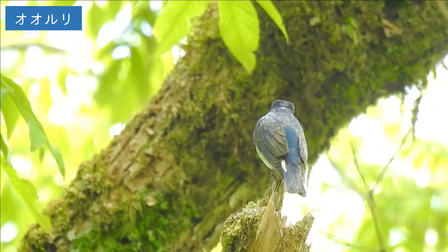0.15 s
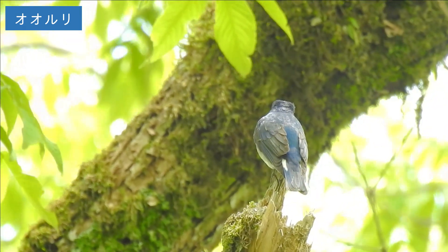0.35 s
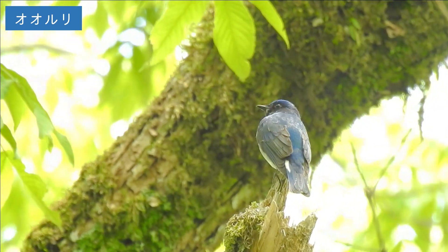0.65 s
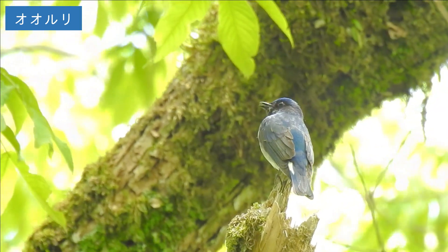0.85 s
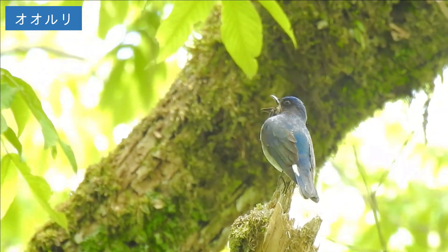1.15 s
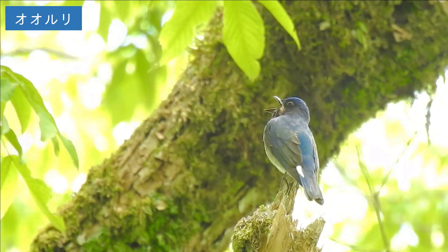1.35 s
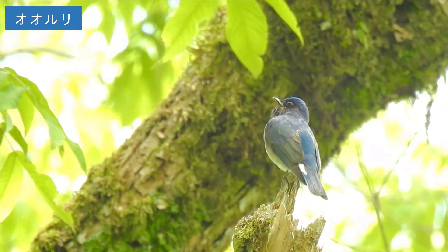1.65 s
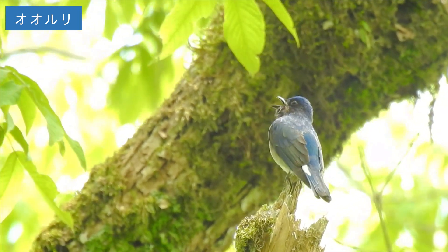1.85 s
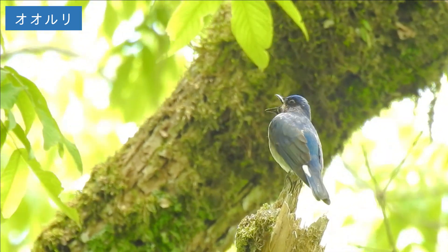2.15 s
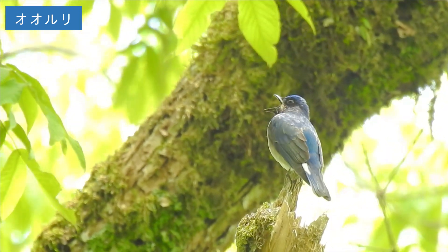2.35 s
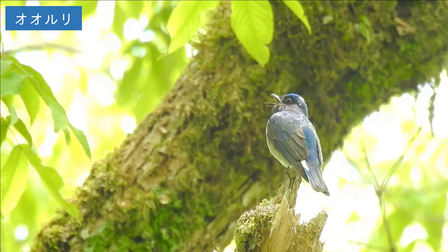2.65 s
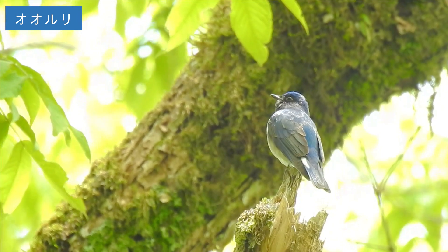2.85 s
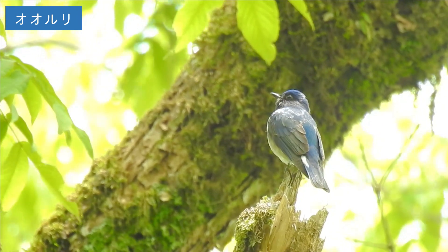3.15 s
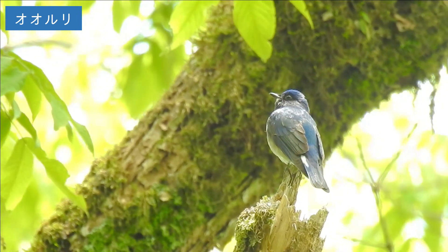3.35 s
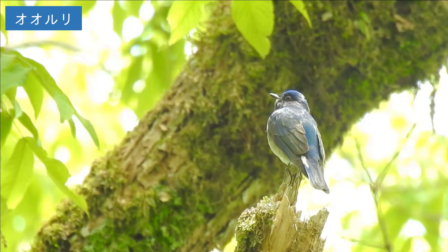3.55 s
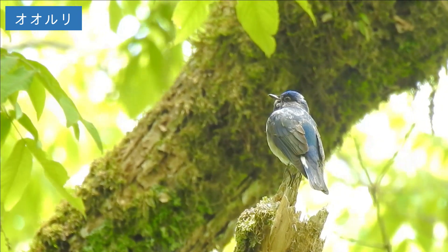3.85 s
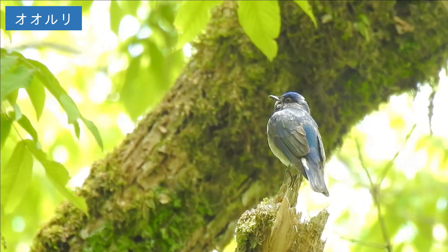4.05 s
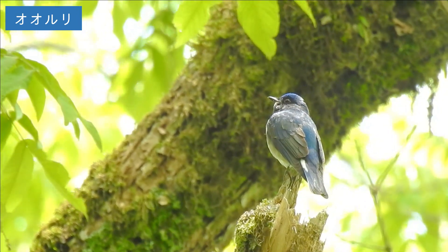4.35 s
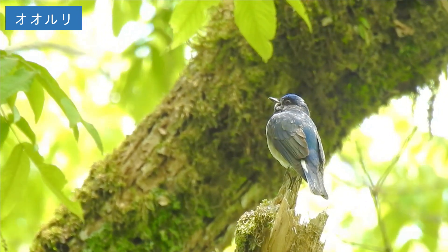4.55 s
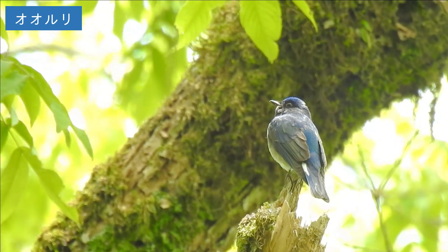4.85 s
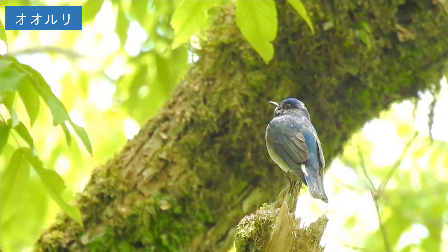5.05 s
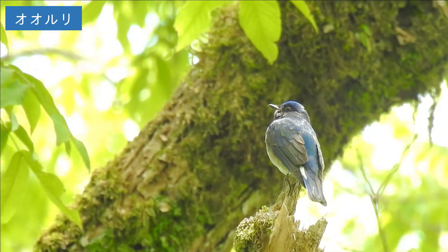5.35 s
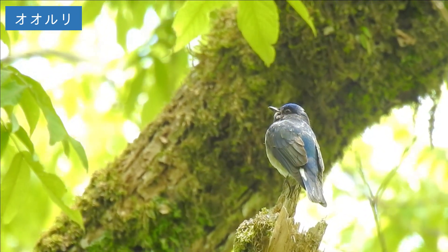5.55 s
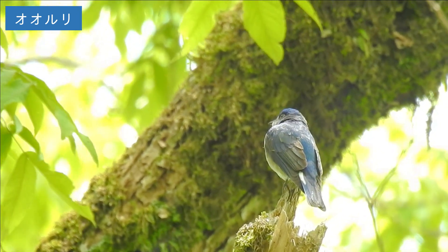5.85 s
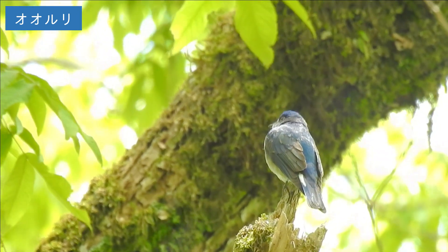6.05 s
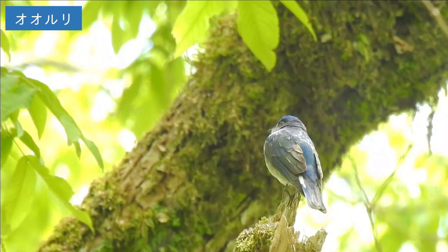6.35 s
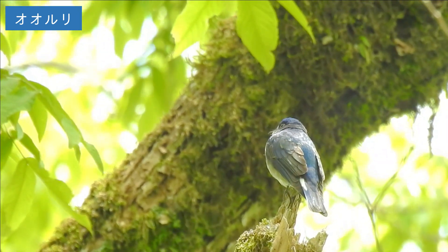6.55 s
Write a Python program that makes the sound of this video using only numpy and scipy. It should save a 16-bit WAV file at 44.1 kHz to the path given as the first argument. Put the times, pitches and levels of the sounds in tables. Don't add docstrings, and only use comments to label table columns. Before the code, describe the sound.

In an echoing wood, far thrushes whistle softly over low rumble, distant stream and leaf hiss. About a second in, a near songbird delivers high and low whistles, then a fast sinking trill, hoarse sweeps and a dry rattling buzz. A fly briefly thrums close to the left microphone during the trill. Afterwards only faint birds and tiny twig ticks remain, with one soft arching whistle near the end.

```python
import sys
import numpy as np
from scipy import signal
from scipy.fft import rfft, irfft, next_fast_len
from scipy.io import wavfile
from scipy.ndimage import uniform_filter1d, map_coordinates

SR = 44100
rng = np.random.default_rng(int(sys.argv[2]) if len(sys.argv) > 2 else 0)


def output_pcm(signal):
    pcm = np.clip(np.atleast_2d(signal).T, -1, 1) * 32767
    wavfile.write(sys.argv[1], SR, np.round(pcm).astype(np.int16))


def ratio_of_db(decibels):
    return 10 ** (np.asarray(decibels, float) / 20)


N = 295911

# f/Hz, t60/s
TREE_DECAY = [(1500, 0.98), (4000, 1), (8000, 0.64), (14000, 0.22)]


def singer():
    # f/Hz, depth/dB
    second_voice = [(3930, -38.5), (7860, -62)]
    # f/Hz, level/dB
    port_colour = [(5600, 0), (6900, 5.5), (8000, 0), (8800, -3), (12000, -4.5), (14000, -17),
                   (16000, -18.5)]
    # t/s, echo level/dB, hoarseness/dB
    facing = [(.95, -8, .4), (1.365, -8, .4), (1.375, -3, 1.1), (1.8, -2, 1.1), (1.815, -10, .4),
              (1.96, -10, .4), (1.972, -3, 2.2), (2.2, -6, 2.2)]
    paths = np.zeros((2, N))
    t = np.arange(N) / SR
    waver = 17 * tremor(250)
    for k, (s, length, from_hz, to_hz, db, swell) in enumerate(phrase()):
        note = whistle(length, from_hz, to_hz, swell, edge=0.65, waver=waver[round(s * SR):])
        add(paths[k % 2], s, ratio_of_db(db) * note)
    flutter = sum(2 * ratio_of_db(db) * np.cos(2 * np.pi * hz * t) for hz, db in second_voice)
    paths = paths * (1 + flutter * (t < 1.372))
    paths = filtered(paths, lambda hz: ratio_of_db(along(port_colour, hz)))

    s, echo_db, hoarse_db = np.transpose(facing)
    paths = paths * ratio_of_db(np.interp(t, s, hoarse_db) * tremor(330)[:N])
    thrown = paths * ratio_of_db(np.interp(t, s, echo_db))
    haze = echoes(thrown, alike=0.4, near_db=9, near_t60=0.3)
    notes = panned(paths.sum(axis=0) + haze, 1.8)

    rattle = buzz()
    rattle_haze = ratio_of_db(2) * echoes(rattle[None], alike=0.2, near_db=3, near_t60=0.3)
    return notes + panned(rattle + rattle_haze, 3.2)


def phrase():
    # t/s, length/s, end f/Hz, level/dB
    high = [(0.958, 0.057, 5380, -26.5), (1.001, 0.02, 5460, -25.5), (1.026, 0.025, 5515, -28.5),
            (1.155, 0.052, 5330, -22), (1.198, 0.013, 5405, -20), (1.216, 0.1, 5304, -30)]
    # t/s, level/dB
    flips = [
        (1.018, -36),
        (1.212, -31),
    ]
    # t/s, length/s, level/dB
    held = [(1.026, 0.056, -22.5), (1.069, 0.025, -19.5), (1.09, 0.016, -23), (1.118, 0.031, -22.5),
            (1.14, 0.044, -28), (1.218, 0.047, -20.5), (1.265, 0.029, -17), (1.31, 0.046, -23.5),
            (1.352, .026, -27.5)]
    # t/s, level/dB, drop/Hz
    trill = [(1.371, -25, 200), (1.411, -20.5, 227), (1.448, -21, 290), (1.48, -18, 499),
             (1.524, -18.5, 243), (1.556, -15.5, 251), (1.588, -18, 71.2), (1.629, -20, 223),
             (1.666, -22, 155.5), (1.704, -24, 89.3), (1.743, -40.5, 59), (1.774, -31, 29.4)]
    # t/s, length/s, start f/Hz, end f/Hz, level/dB
    closing = [(1.815, .026, 3720, 3530, -26.5), (1.834, 0.031, 3540, 3472, -17.5),
               (1.86, 0.019, 3440, 3444, -22.5), (1.872, 0.046, 3413, 3395, -17),
               (1.921, 0.025, 3384, 3365, -16), (1.945, 0.01, 3330, 3214, -25.5),
               (1.974, .03, 4380, 3906, -27), (1.968, .02, 4000, 3960, -32), (2.0, .03, 4200, 3850, -29),
               (2.04, .03, 4300, 3900, -34), (1.978, .062, 3950, 3322, -22),
               (2.062, 0.0524, 3750, 3347, -25.5)]
    climb_hz, high_swell = 80, 0.72
    flip_s, flip_hz = 0.012, 4990
    held_hz, held_swell = 4300, 0.33
    stroke_s, stroke_swell = 0.0337, 0.24
    trill_top_hz, trill_rest_hz, trill_sink_s = 4415, 3836, 0.118
    lead_s, lead_hz, lead_db = 0.011, 330, -20

    notes = [(s, length, hz - climb_hz, hz, db, high_swell) for s, length, hz, db in high]
    notes += [(s, flip_s, flip_hz, held_hz, db, held_swell) for s, db in flips]
    notes += [(s, length, held_hz, held_hz, db, held_swell) for s, length, db in held]
    strokes, leads = [], []
    for s, db, drop_hz in trill:
        sunk = np.exp((trill[0][0] - s) / trill_sink_s)
        land_hz = trill_rest_hz + (trill_top_hz - trill_rest_hz) * sunk
        top_hz = land_hz + drop_hz
        strokes.append((s, stroke_s, top_hz, land_hz, db, stroke_swell))
        leads.append((s - lead_s / 4, lead_s, top_hz + lead_hz, top_hz, db + lead_db, stroke_swell))
    return notes + strokes + leads + [(*note, 0.64) for note in closing]


def whistle(length, from_hz, to_hz, swell, edge, waver):
    # multiple of the pitch, level/dB
    overtones = [(2, -37), (3, -39)]
    u = np.linspace(0, 1, max(round(length * SR), 8))
    pitch_hz = to_hz + (from_hz - to_hz) * (1 - u) ** 2.394 + waver[:len(u)]
    turns = 2 * np.pi * np.cumsum(pitch_hz) / SR
    swell_place = np.interp(u, [0, np.clip(swell, 0.05, 0.95), 1], [0, 0.5, 1])
    shape = np.sin(np.pi * swell_place) ** edge
    tone = np.sin(turns) + sum(ratio_of_db(db) * np.sin(k * turns) for k, db in overtones)
    return np.sqrt(2) * shape * tone


def buzz(rate_hz=216, life=0.0023):
    # t/s, level/dB
    effort = [(2.238, -27), (2.284, -28), (2.3, -76), (2.333, -64), (2.336, -25), (2.42, -23), (2.5, -32),
              (2.621, -34), (2.77, -46)]
    # f/Hz, density/dB per Hz
    beak = [(2530, -43.5), (4300, -7), (5300, -2), (6640, -5), (7350, -3), (8570, -3.5), (9870, -19),
            (11100, -16), (12600, -30), (13200, -45), (15000, -49)]
    # start t/s, end t/s
    breaths = [
        (2.239, 2.3),
        (2.3352, 2.77),
    ]
    fresh_hz, spent_hz = (4910, 9257), (6500, 8100)
    narrow_s, return_db = 2.46, -6
    s, effort_db = np.transpose(effort)
    luck = rng.standard_normal((130, 3))
    beats = np.concatenate([np.arange(a, b, 1 / rate_hz) for a, b in breaths])
    beat_db = np.interp(beats, s, effort_db)
    spent = np.interp(beats, [narrow_s, s[-1]], [0, 1])[:, None] ** 0.76
    low_hz, top_hz = (full + (last - full) * spent for full, last in zip(fresh_hz, spent_hz))

    u = np.linspace(0, 1, round(life * SR))
    turns = 2 * np.pi * np.cumsum(top_hz + (low_hz - top_hz) * u, axis=1) / SR
    chirps = np.sin(np.pi * u) ** 1.04 * np.sin(turns)
    chirps = chirps + 3 * chirps ** 2
    out = np.zeros(N)
    for at, chirp, db, (late, size, back) in zip(beats, chirps, beat_db, luck):
        upward = ratio_of_db(return_db + 3 * back) * chirp[::-1]
        beat = np.concatenate([chirp, upward])
        add(out, at + 0.00045 * late, ratio_of_db(db + 2 * size) * beat)
    return 2.54 * filtered(out, lambda hz: ratio_of_db(along(beak, hz)))


def arch():
    start_s, up_s, down_s = 6.045, 0.155, 0.056
    foot_hz, top_hz = 3150, 4200
    path = np.zeros(N)
    waver = 35 * tremor(199.3)
    up = whistle(up_s, foot_hz, top_hz, 0.98, edge=0.37, waver=waver)
    down = whistle(down_s, foot_hz, top_hz, 0.6, edge=0.25, waver=waver)[::-1]
    add(path, start_s, ratio_of_db(-47) * np.concatenate([up, ratio_of_db(0.5) * down]))
    haze = echoes(path[None], alike=0.31, near_db=8.0, near_t60=0.39)
    return panned(path + ratio_of_db(3.5) * haze, 1.6)


def flies():
    # t/s, wing f/Hz, left level/dB, right level/dB, tilt/dB per octave of overtones,
    # odd partials/dB as it turns edge-on
    passes = [
        [(1.49, 122.7, -67.5, -74, -7, 0), (1.52, 128, -15.5, -39, -17, 1), (1.545, 170.2, -7.5, -26, -8.5, 1),
         (1.56, 176.7, -14, -24.5, -3.5, -2.5), (1.578, 177.2, -11, -28, -8, -15),
         (1.595, 175.5, -34, -43, -6, -16), (1.612, 168, -40, -58, -2, -5), (1.632, 162, -30, -49, -4.5, -11.5),
         (1.68, 159.5, -53, -60, -7, 2)],
        [(6.59, 167.7, -51, -45, -11, -1), (6.65, 170.8, -58, -45.5, -1.5, -1),
         (6.69, 181, -48, -38.5, -3.5, 0), (6.71, 177, -46, -49.5, -9, 0)],
    ]
    wing_side = [-1, 1]
    out = np.zeros((2, N))
    gust = tremor(85.0)
    for path, side in zip(passes, wing_side):
        s, *cols = np.transpose(path)
        t = np.arange(s[0], s[-1], 1 / SR)
        hz, left_db, right_db, tilt_db, odd_db = (np.interp(t, s, c) for c in cols)
        turns = 2 * np.pi * np.cumsum(hz) / SR
        odd_db = odd_db * np.array([[1], [0.3]])
        beat = 0
        for k in range(1, 9):
            partial_db = tilt_db * np.log2(k) - 2.68 * (k + 1.5) + k % 2 * odd_db
            phase = k * turns + 1.2 * (k - 1) + 0.084 * (k - 1) * gust[:len(hz)]
            beat = beat + ratio_of_db(partial_db) * np.cos(phase)
        add(out, s[0], np.sqrt(2) * beat * [ratio_of_db(left_db), side * ratio_of_db(right_db)])
    return out


def twigs():
    # t/s, peak level/dB, f/Hz, left-right/dB
    ticks = [(0.436, -37, 5730, 12), (0.95, -39, 5330, -1), (1.519, -39, 1095, 18),
             (1.526, -42.5, 2480, 13.5), (1.537, -32, 6200, 17.5), (2.103, -38, 6460, 7),
             (2.2394, -19, 7000, 2), (2.3352, -19, 7000, -1), (4.808, -23.5, 7360, 4),
             (5.473, -42, 6500, 2), (5.559, -37, 5100, 3), (5.561, -38, 7160, 8), (5.876, -44, 6800, 3),
             (6.0308, -39.5, 6000, -1)]
    width_hz = 1780
    out = np.zeros((2, N))
    t = np.arange(1500) / SR
    fade = ratio_of_db(-60 * t / 0.0061) + 0.13 * ratio_of_db(-60 * t / 0.075)
    shape = (1 - np.exp(-t / 0.00024)) * fade
    for (s, db, hz, lr_db), noise in zip(ticks, rng.standard_normal((16, 1500))):
        crack = filtered(noise, lambda f: np.exp(-((f - hz) / width_hz) ** 2))
        add(out, s, panned(ratio_of_db(db - 2) * unit(crack) * shape, lr_db))
    return out


def chorus():
    # t/s, level/dB
    tit_calls = [(.08, -57.5), (.62, -58.5), (1.141, -68), (1.681, -61), (3.265, -61.5), (3.798, -61),
                 (4.33, -60), (6.252, -61)]
    # delay/s, length/s, start f/Hz, end f/Hz, level/dB
    motif = [
        (0, 0.11, 7050, 6780, 5),
        (0.067, 0.047, 4050, 4680, 2.5),
        (0.096, 0.062, 4450, 5080, -2),
        (.13, .07, 4750, 5330, -3.5),
        (0.302, 0.06, 3070, 3620, 8),
        (0.342, 0.061, 3680, 3550, 7),
    ]
    # t/s, length/s, centre f/Hz,
    # width/Hz, level/dB
    scolds = [(0, .4, 2700, 1400, -56), (.04, .24, 2900, 550, -50), (.21, .19, 2250, 550, -53),
              (.68, .19, 2500, 450, -55), (.43, .1, 5800, 4000, -58), (.7, .055, 3600, 2400, -48),
              (.89, .1, 2900, 1600, -55), (1.21, .12, 5900, 1800, -47), (1.97, .2, 6900, 1200, -56),
              (1.74, .09, 3200, 800, -55), (2.07, .2, 2300, 1200, -54), (2.44, .3, 2600, 700, -57),
              (2.81, .2, 2000, 800, -58), (3.3, .2, 2200, 700, -58), (3.52, .22, 1950, 700, -58),
              (5.3, .09, 3800, 1400, -62), (5.46, .34, 2100, 1700, -55), (5.47, .06, 3000, 2000, -58),
              (5.542, .022, 3550, 500, -56), (5.54, .14, 6800, 1600, -61), (4.07, .12, 2650, 700, -61),
              (6.22, .14, 3700, 900, -57), (5.82, .24, 2350, 1100, -54), (6.28, .43, 2500, 1300, -56)]
    direct_db, echo_db = -6, 0
    quick, quick_t60 = 2.4, 0.18
    out = np.zeros((2, N))
    waver = 38 * tremor(160)
    t = np.arange(SR // 2) / SR
    gusts_db = 3 * tremor(60)
    tit = [(s + delay, length, a, b, db + step_db, 0, 0.3)
           for s, db in tit_calls for delay, length, a, b, step_db in motif]
    leaves = rng.standard_normal((2, 4 * SR))
    starts = rng.integers(3 * SR, size=200)
    for (s, length, from_hz, to_hz, db, lr_db, swell), path in zip(sorted(far_notes() + tit), starts):
        at = round(s * SR)
        note_waver = waver[at:] * (to_hz / 2500) ** 2
        note = ratio_of_db(db) * whistle(length, from_hz, to_hz, swell, edge=0.35, waver=note_waver)
        note = note * ratio_of_db(gusts_db[at:][:len(note)])
        decay = ratio_of_db(-60 * t / along(TREE_DECAY, to_hz)) + quick * ratio_of_db(-60 * t / quick_t60)
        tail = leaves[:, path:path + len(t)] * decay
        haze = signal.fftconvolve(note[None], tail + 0.5 * tail[::-1], axes=1)
        haze = haze * np.linalg.norm(note) / np.linalg.norm(haze, axis=1, keepdims=True)
        add(out, s, ratio_of_db(direct_db) * panned(note, lr_db))
        add(out, s, ratio_of_db(echo_db) * haze)

    for (s, length, hz, width_hz, db), noise in zip(scolds, rng.standard_normal((24, 2, SR // 2))):
        blend = noise + 2.1 * noise[::-1]
        rasp = filtered(blend, lambda f: np.exp(-((f - hz) / width_hz * 2) ** 4))[:, :round(length * SR)]
        add(out, s, ratio_of_db(db + 3.5) * unit(rasp) * np.hanning(rasp.shape[1]) ** 0.5)
    return out


def far_notes():
    # t/s, end f/Hz, level/dB
    hooks = [(.03, 3090, -36), (.21, 2360, -38.5), (2.43, 2434, -47.5), (2.805, 2260, -48),
             (3.31, 2353, -45.5), (3.42, 2850, -47.5), (3.525, 2173, -48), (4.33, 2700, -53),
             (5.5, 1970, -60)]
    # t/s, length/s, end f/Hz, level/dB
    rising = [(0.371, 0.098, 2075, -48.5), (0.431, 0.0974, 2128, -46), (.5, 0.089, 2200, -43),
              (0.674, 0.047, 2638, -42), (1.209, 0.059, 2190, -48.5), (1.27, .05, 2474, -60),
              (1.356, .12, 2736, -53.5), (1.541, 0.051, 2710, -66.5), (6.222, 0.05, 2420, -57),
              (2.488, .04, 2880, -53), (3.045, 0.05, 2916, -46.5), (2.904, 0.086, 2850, -57),
              (3.695, 0.081, 2820, -56.5), (3.895, 0.03, 3084, -56), (4.911, 0.106, 2398, -53.5),
              (4.946, 0.087, 4920, -64), (5.56, 0.062, 2170, -63), (6.19, 0.121, 2940, -51),
              (6.48, 0.052, 2530, -53), (6.625, .08, 2600, -57)]
    # t/s, length/s, end f/Hz, level/dB
    steady = [(0, 0.035, 3348, -42), (0.191, 0.027, 2700, -49), (.74, 0.15, 2606, -52),
              (.72, 0.051, 1967, -57), (1.48, 0.048, 2410, -47.5), (1.775, 0.03, 4930, -55),
              (2.175, 0.026, 2370, -44.5), (2.086, 0.041, 2620, -50), (3.115, 0.023, 2940, -50),
              (3.94, 0.11, 2900, -66), (4.379, 0.18, 2695, -60.5), (0.519, 0.052, 2700, -46),
              (.6, 0.12, 2200, -53), (1.62, 0.084, 2460, -59), (2.25, 0.067, 2655, -52.5),
              (2.553, 0.035, 3030, -47.5), (2.615, .032, 3034, -44), (2.665, 0.035, 3040, -51),
              (2.715, 0.03, 3030, -52), (2.905, 0.04, 1670, -55), (2.984, 0.075, 2743, -46),
              (3.17, 0.12, 2805, -54.5), (3.29, 0.034, 2494, -52), (5.0, 0.33, 1353, -59),
              (5.52, .05, 2000, -54), (5.58, .05, 1950, -54), (5.5, .03, 1720, -55), (5.61, .03, 1750, -56),
              (4.09, .06, 2650, -57), (5.2, 0.25, 2493, -56), (5.67, 0.05, 2793, -55),
              (5.755, .04, 2790, -55), (5.68, 0.06, 2254, -57), (5.76, .04, 2250, -58),
              (5.85, .06, 3200, -59), (5.859, 0.084, 2407, -51), (6.36, 0.11, 2930, -62),
              (6.49, 0.06, 2270, -58), (6.295, 0.023, 2230, -51.5), (.76, 0.089, 2392, -50.5),
              (.09, 0.071, 3057, -42)]
    # t/s, length/s, end f/Hz, level/dB
    sagging = [(.28, 0.079, 2215, -45.5), (0.7, 0.062, 2404, -45.5), (0.928, 0.091, 4420, -56.5),
               (1.36, 0.036, 2093, -54.5), (1.841, 0.061, 2620, -49.5), (2.615, 0.05, 2320, -46),
               (2.73, .04, 2300, -53), (2.86, .04, 2150, -52), (2.698, 0.081, 2857, -53),
               (3.1, 0.102, 2830, -56), (3.47, 0.081, 2740, -59), (3.57, 0.072, 1870, -61),
               (4.878, 0.109, 6700, -59), (5.35, 0.019, 1443, -48.5), (5.46, 0.078, 2180, -54),
               (5.83, 0.059, 2067, -47.5), (5.92, 0.063, 2145, -51), (5.97, 0.081, 2626, -46),
               (6.66, 0.068, 3050, -55.5)]
    # t/s, length/s, end f/Hz, level/dB
    falling = [(.09, 0.043, 2745, -32.5), (0.2, .12, 2614, -50), (5.4, 0.043, 2300, -49),
               (7.2, 0.031, 2035, -52), (2.87, 0.046, 1800, -58)]
    # start over end pitch [ratio], left-right/dB, place of the swell [0-1]
    bends = [
        (0.829, 6.5, 0.71),
        (.94, 3.5, 0.14),
        (1.001, 8.5, 0.1),
        (1.051, 6, 0.06),
        (1.14, 6, 0.3),
    ]
    kinds = [[(s, 0.0676, hz, db) for s, hz, db in hooks], rising, steady, sagging, falling]
    return [(s, length, bend * hz, hz, db, lr_db, swell)
            for kind, (bend, lr_db, swell) in zip(kinds, bends) for s, length, hz, db in kind]


def forest():
    # t/s, level/dB
    stream_level = [(0.0, -53.5), (6.71, -53.5)]
    # start t/s, end t/s, level/dB
    ducks = [(0, 0.594, -6), (0.705, 0.862, -7), (1.014, 2.323, -7.5), (2.467, 2.675, -4.5),
             (3.025, 3.147, -5.5), (3.338, 3.522, -2.5), (6.058, 6.306, -6.5)]
    # f/Hz, width/Hz, level/dB
    far_drone = (965, 30, -73)
    # f/Hz, density/dB per Hz
    rumble_colour = [(15, -28.5), (25, -15.5), (64, 0.5), (91, 0.5), (146, 1), (210, -1), (270, -26.5),
                     (460, -120)]
    # f/Hz, density/dB per Hz
    stream_colour = [(120, -43), (200, -1.5), (258, 0.5), (880, -5.5), (965, -4.5), (1660, -11.5),
                     (2300, -10.5), (2990, -22.5), (5060, -120)]
    # f/Hz, density/dB per Hz
    leaf_colour = [(1290, -19.5), (2200, -8), (2590, -1), (3030, -6.5), (3490, -7.5), (3880, -7.5),
                   (5480, -8), (6730, -5), (8340, -15), (13900, -26.5), (15700, -31)]
    t = np.arange(N) / SR
    s, stream_db = np.transpose(stream_level)
    duck_db = uniform_filter1d(sum(db * ((t >= a) & (t < b)) for a, b, db in ducks), size=900)
    hz, width_hz, db = far_drone
    hum = filtered(rng.standard_normal(N), lambda f: np.exp(-((f - hz) / width_hz) ** 2))
    stream = ratio_of_db(np.interp(t, s, stream_db)) * rush(stream_colour, patchy_db=1.5) + ratio_of_db(db) * unit(hum)
    rumble = ratio_of_db(-55.0) * rush(rumble_colour, patchy_db=2)
    leaves = ratio_of_db(-53.5) * rush(leaf_colour, patchy_db=-1.6)
    return panned(rumble + ratio_of_db(duck_db) * stream + leaves, 1)


def rush(spectrum, patchy_db):
    # f/Hz, left-right correlation [-1 to 1]
    likeness = [(60, 0.58), (180, 0.37), (550, 0.58), (1650, 0.6), (4970, 0.14), (15000, -0.0)]
    z = signal.stft(rng.standard_normal((2, N + 512)), nperseg=512)[2]
    field = uniform_filter1d(rng.standard_normal(z.shape[1:]), size=6, axis=0)
    field = uniform_filter1d(field, size=14, axis=1)
    pair = signal.istft(z * ratio_of_db(patchy_db * unit(field)), nperseg=512)[1][:, :N]

    def mid_side(hz):
        turn = np.arccos(np.clip(along(likeness, hz), -1, 1)) / 2
        return ratio_of_db(along(spectrum, hz)) * [np.cos(turn), np.sin(turn)]

    mid, side = filtered(pair, mid_side)
    return unit(np.array([mid + side, mid - side]))


def echoes(paths, alike, near_db, near_t60):
    hz, t, z = signal.stft(rng.standard_normal((len(paths), 2, SR)), SR, nperseg=256)
    trunks = ratio_of_db(-60 * t / along(TREE_DECAY, hz)[:, None])
    branches = ratio_of_db(near_db - 60 * t / near_t60)
    tails = signal.istft(z * (trunks + branches), SR, nperseg=256)[1]
    tails = tails * ratio_of_db(2.5 * tremor(89.2)[:tails.shape[2]])
    tails = tails + alike * tails[:, ::-1]
    tails = tails / np.linalg.norm(tails[:, :1], axis=2, keepdims=True)
    tails = np.pad(tails, ((0, 0), (0, 0), (60, 0)))
    return signal.fftconvolve(paths[:, None], tails, axes=2)[..., :N].sum(axis=0)


def tremor(rate):
    return map_coordinates(rng.standard_normal(4000), [np.arange(N + SR) * rate / SR])


def unit(x):
    return x / np.sqrt(np.mean(x ** 2) + 1e-20)


def along(points, hz):
    f, v = np.transpose(points)
    return np.interp(np.log(hz + 1), np.log(f + 1), v)


def filtered(x, response):
    m = next_fast_len(x.shape[-1] + 8192)
    spectrum = rfft(x, m) * response(np.fft.rfftfreq(m, 1 / SR))
    return irfft(spectrum, m)[..., :x.shape[-1]]


def add(track, s, sound):
    part = track[..., max(round(s * SR), 0):][..., :sound.shape[-1]]
    part += sound[..., :part.shape[-1]]


def panned(sound, lr_db):
    return sound * ratio_of_db([[lr_db / 2], [-lr_db / 2]])


def scene():
    return forest() + singer() + chorus() + flies() + twigs() + arch()


def roll_off(x):
    return signal.sosfilt(signal.butter(12, 15960, fs=SR, output="sos"), x)


def record(dry):
    mix = filtered(dry, lambda hz: hz < 15800)
    return roll_off(mix)


dry = scene()
out = record(dry)
output_pcm(out)
```